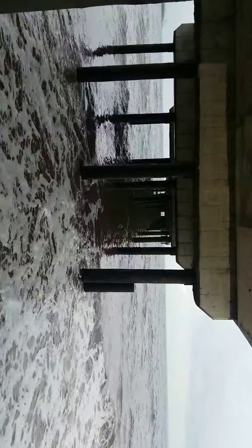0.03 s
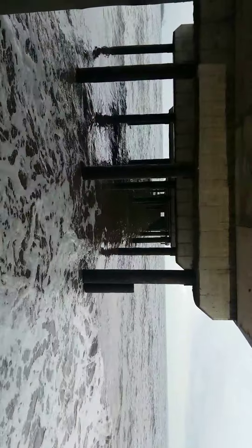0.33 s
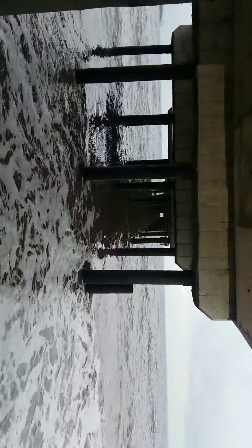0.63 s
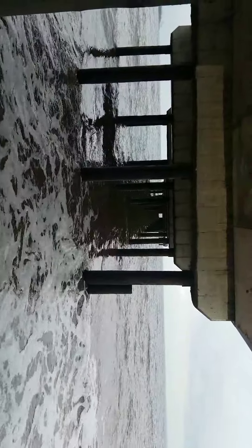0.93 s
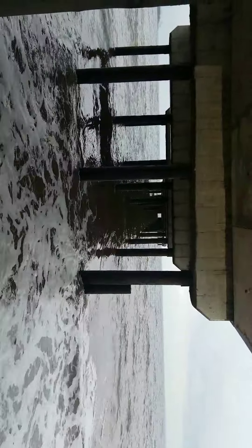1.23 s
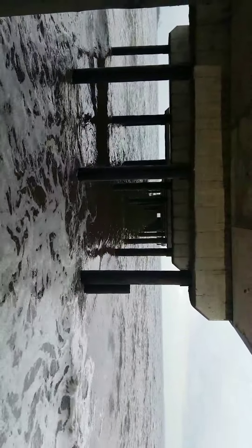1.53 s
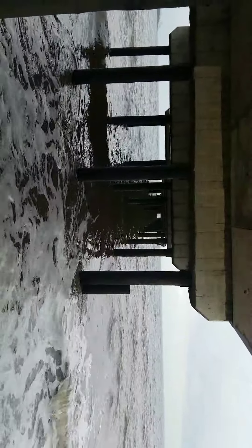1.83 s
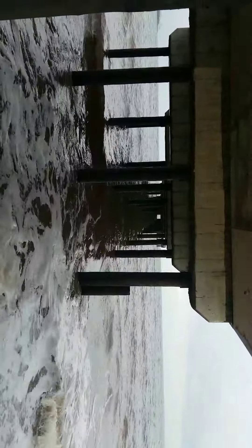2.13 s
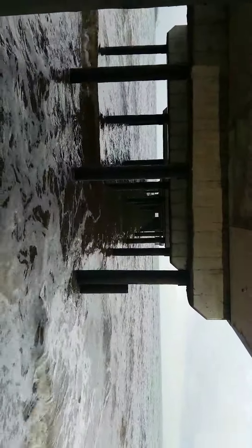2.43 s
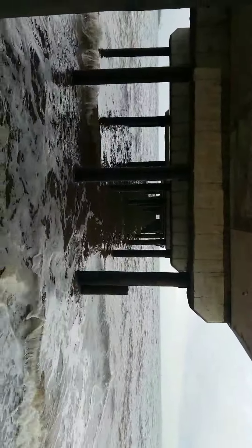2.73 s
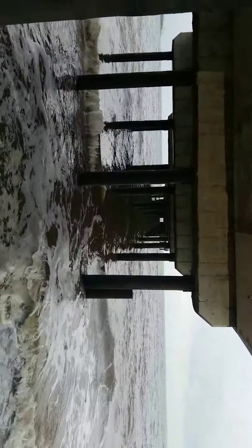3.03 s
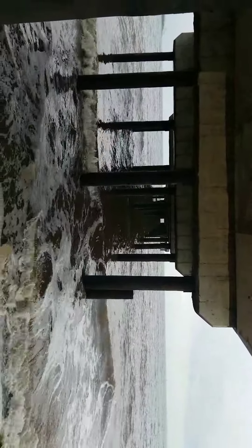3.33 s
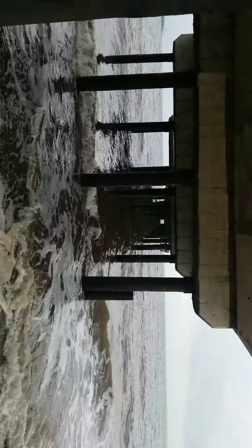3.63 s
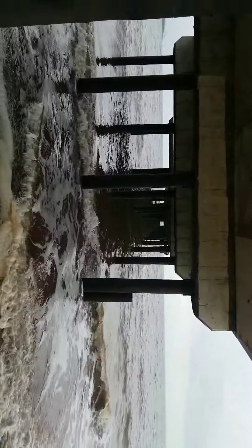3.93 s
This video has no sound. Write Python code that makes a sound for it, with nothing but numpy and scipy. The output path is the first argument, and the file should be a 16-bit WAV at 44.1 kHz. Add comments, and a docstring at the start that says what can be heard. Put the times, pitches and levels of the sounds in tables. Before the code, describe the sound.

Surf fizzes around pier pillars and swells into a roaring, churning breaker.

```python
"""Sea waves heard from under a concrete pier, on two microphones a hand's length apart.
Foam fizzes as the last wave drains round the pillars, with small slaps, gulps and a light breeze.
From about 1 s a larger wave rolls in with a growing roar. It plunges just before 3 s, the air caught
under it gives a hollow boom, and it runs on as churning white water."""
import sys
import numpy as np
from scipy import signal
from scipy.fft import rfft, irfft
from scipy.io import wavfile
from scipy.ndimage import uniform_filter1d

SR = 44100
rng = np.random.default_rng(int(sys.argv[2]) if len(sys.argv) > 2 else 0)


def materialize(psi):
    """Save the field psi as 16-bit PCM at rate SR to the path in sys.argv[1].

    A 1-D psi becomes a single channel; in a 2-D psi each row is a channel.
    """
    bounded = np.clip(np.atleast_2d(psi).T, -1, 1)
    quanta = np.round(bounded * 32767).astype(np.int16)
    wavfile.write(sys.argv[1], SR, quanta)


N = 176400


def amp(db):
    """Decibels to gain."""
    return 10 ** (np.asarray(db) / 20)


def unit(x):
    """Scale to rms 1."""
    return x / np.sqrt(np.mean(x ** 2) + 1e-20)


def db_at(colour, hz):
    """Interpolate a spectrum on a log-frequency axis."""
    points_hz, db = np.transpose(colour)
    return np.interp(np.log(hz + 1), np.log(points_hz + 1), db)


def envelope(points):
    """Gain per sample from a level curve."""
    return amp(np.interp(np.arange(N) / SR, *np.transpose(points)))


def add(mix, start_s, sound):
    """Mix a sound in at start_s."""
    part = mix[round(start_s * SR):][:len(sound)]
    part += sound[:len(part)]


def water(colour, arrivals, patchy_db, flicker_db, frame=1024):
    """Bubbles too dense to separate: patchy noise reaching both microphones from several sides."""
    hop, hz = frame // 4, np.fft.rfftfreq(frame, 1 / SR)
    shape = (N // hop + 5, len(hz))
    left, separate = (rng.standard_normal(shape) + 1j * rng.standard_normal(shape) for _ in range(2))
    patches = uniform_filter1d(rng.standard_normal(shape), size=8, axis=0)
    patches = unit(uniform_filter1d(patches, size=16, axis=1))
    flicker = unit(uniform_filter1d(rng.standard_normal(shape[0]), size=7))[:, None]
    # A spread of delays makes the two sides less alike in the treble.
    rad_per_ms = 2 * np.pi * hz / 1000
    coherence = sum(weight * np.exp(-rad_per_ms * (1j * lead_ms + spread_ms * np.tanh(hz / 1500)))
                    for lead_ms, spread_ms, weight in arrivals)
    coherence /= sum(weight for _, _, weight in arrivals)
    right = coherence * left + np.sqrt(np.maximum(1 - abs(coherence) ** 2, 0)) * separate
    gain = amp(db_at(colour, hz) + patchy_db * patches + flicker_db * flicker)
    spectra = gain * np.array([left, right])
    _, sound = signal.istft(spectra.swapaxes(1, 2), nperseg=frame, noverlap=frame - hop)
    return unit(sound[:, :N])


def bubble_rings(per_s, low_hz, high_hz, decay_cycles, glide, spread_db, pitches=30):
    """Single bubbles: short rising rings of many sizes, each pitch from its own side."""
    out = np.zeros((2, N))
    for hz in np.geomspace(low_hz, high_hz, pitches):
        age = np.arange(0, 5 * decay_cycles / hz, 1 / SR) * hz / decay_cycles
        ring = np.exp(-age) * np.sin(2 * np.pi * decay_cycles * age * (1 + glide * age))
        sizes = amp(spread_db * np.minimum(rng.exponential(1, N), 4.5))
        onsets = rng.random(N) < per_s / pitches / SR
        train = signal.oaconvolve(sizes * onsets, ring)[:N]
        leftward = rng.uniform(-1, 1)
        out += [train * amp(leftward), np.roll(train, round(leftward * 22)) * amp(-3 * leftward)]
    return unit(out)


# Wind spectrum. Each row: frequency in Hz, relative density in dB.
BREEZE_SPECTRUM = [(10, -9), (30, 2), (60, 0), (120, -12), (300, -21), (1000, -48)]
def breeze(level_db=-50.5):
    """Light air rumbles at each microphone separately."""
    gain = amp(db_at(BREEZE_SPECTRUM, np.fft.rfftfreq(N, 1 / SR)))
    return amp(level_db) * unit(irfft(rfft(rng.standard_normal((2, N))) * gain, N))


# Backwash spectrum. Each row: frequency in Hz, relative density in dB.
WASH_SPECTRUM = [(20, -25.5), (45, -4.5), (110, 0), (180, -1), (230, 1), (290, -1.5), (380, -1.5),
                 (550, -9), (800, -12), (1500, -18), (3000, -19.5), (8000, -24), (16000, -47)]
# Its directions. Each row: lead at the left microphone in ms, spread in ms, weight.
WASH_ARRIVALS = [(0.51, .07, 0.54), (-0.38, 0.13, 0.12), (.25, .3, 0.43)]
def backwash(level_db=-35):
    """The spent wave drains steadily round the pillars."""
    return amp(level_db) * water(WASH_SPECTRUM, WASH_ARRIVALS, patchy_db=1.34, flicker_db=0.23, frame=2048)


# Foam envelope. Each row: time in seconds, level in dB.
FOAM_LEVEL = [(0, -40), (.7, -39.5), (.95, -39), (1.2, -40), (1.6, -38.5), (2.0, -37), (2.4, -36.5),
              (2.55, -38), (2.95, -32.5), (3.15, -31), (3.4, -34.5), (3.9, -36)]
# Its spectrum. Each row: frequency in Hz, relative density in dB.
FOAM_SPECTRUM = [(300, -20), (1200, -4), (2200, -.5), (4000, 0.5), (5200, 0.5), (6500, -.3), (9000, -2.7),
                 (10500, 0.9), (12200, 1), (13600, 0.5), (14800, -2)]
# Its directions. Each row: left lead in ms, spread in ms, weight.
FOAM_ARRIVALS = [(.48, .08, 0.37), (-0.49, .1, 0.67)]
def foam():
    """Tiny bursting bubbles hiss on the surface."""
    return envelope(FOAM_LEVEL) * water(FOAM_SPECTRUM, FOAM_ARRIVALS, patchy_db=1.3, flicker_db=0.54)


# Small splashes. Each row: start in seconds, band centre in Hz, level in dB.
PILLAR_SLAPS = [(.575, 2150, -45), (1.15, 750, -39), (1.329, 2400, -42), (2.39, 1050, -31.5),
                (3.683, 1960, -39)]
def slaps(rise_s=0.0054, decay_s=0.094, width_octaves=0.42):
    """Water slaps the pillars in short bursts of band noise."""
    out, t = np.zeros((2, N)), np.arange(SR // 2) / SR
    hz = np.fft.rfftfreq(len(t), 1 / SR)
    burst = np.minimum(t / rise_s, 1) * np.exp(-t / decay_s)
    for start_s, centre_hz, db in PILLAR_SLAPS:
        band = np.exp(-0.5 * (np.log2((hz + 1) / centre_hz) / width_octaves) ** 2)
        for channel in out:
            splash = unit(irfft(rfft(rng.standard_normal(len(t))) * band, len(t)))
            add(channel, start_s, amp(db) * burst * splash)
    return out


# Trapped air. Each row: start in seconds, pitch in Hz, level in dB, ring time in seconds.
AIR_POCKETS = [(1.0, 108.5, -34, .05), (1.19, 276, -31, .03), (2.231, 186, -28.5, 0.059),
               (2.469, 163, -31.5, 0.028), (2.82, 40.3, -29, .06), (2.92, 135, -21.5, 0.044),
               (3.4, 288, -26, 0.04)]
def gulps(glide=0.029):
    """Large air pockets ring briefly, rising a little in pitch."""
    out, t = np.zeros(N), np.arange(SR // 2) / SR
    for start_s, hz, db, ring_s in AIR_POCKETS:
        age = t / ring_s
        swell = 2 * age * np.exp(1 - 2 * age)
        tone = np.sin(2 * np.pi * (hz * t * (1 + glide * age) + rng.random()))
        add(out, start_s, amp(db) * swell * tone)
    return out


# Boom spectrum. Each row: frequency in Hz, relative density in dB.
BOOM_SPECTRUM = [(20, -24), (65, -14.5), (95, -18), (114, 4), (148, -6), (180, -19), (222, 0), (258, -2),
                 (310, -8.5), (420, -14), (550, -20), (2000, -58)]
# Its direction. One row: left lead in ms, spread in ms, weight.
BOOM_ARRIVALS = [(.1, 0.074, 1)]
def plunge(start_s=2.81, rise_s=0.079, fall_after_s=0.34, fall_db_per_s=11, level_db=-25):
    """The crest falls and the air caught under it booms."""
    t = np.arange(N) / SR - start_s
    attack = np.clip(t / rise_s, 0, 1)
    gain = amp(level_db - fall_db_per_s * np.maximum(t - fall_after_s, 0))
    return attack * gain * water(BOOM_SPECTRUM, BOOM_ARRIVALS, patchy_db=0.5, flicker_db=1.7, frame=4096)


# Roller and white-water envelopes. Each row: time in seconds, level in dB.
ROLLER_LEVEL = [(0, -63), (.8, -43.5), (1.0, -37), (1.23, -38.5), (1.42, -33), (1.68, -32.5), (1.9, -28.5),
                (2.12, -28), (2.35, -26.5), (2.55, -26.5), (2.8, -26.5), (3.2, -30.5), (3.9, -33)]
SURF_LEVEL = [(0, -83), (1.8, -58), (2.3, -34), (2.55, -31.5), (2.75, -27.5), (3.0, -26), (3.12, -23),
              (3.3, -23), (3.52, -24.5), (3.7, -24.5), (3.9, -26.5)]
# Their spectra. Each row: frequency in Hz, relative density in dB.
ROLLER_SPECTRUM = [(20, -31), (60, -15), (120, -4.5), (200, 3), (270, -4), (350, -2.5), (520, -10),
                   (850, -10), (1300, -16), (3600, -17.5), (6000, -21.5), (9000, -26.5), (16000, -28)]
SURF_SPECTRUM = [(20, -22), (65, -9), (130, -5.5), (180, -5.5), (240, 0), (350, 0.5), (510, -7.5),
                 (800, -5), (1400, -10), (2100, -10.5), (4000, -14), (6500, -19.5), (9000, -23),
                 (16000, -29)]
# Their directions. Each row: left lead in ms, spread in ms, weight.
ROLLER_ARRIVALS = [(0.34, .06, .55), (-0.39, .13, .43), (0.085, .1, 0.1)]
SURF_ARRIVALS = [(0.092, 0.057, 0.37), (0.26, 0.18, .45), (-0.14, 0.15, .17)]
def wave(spray_relative_db=-14.5, bubbles_relative_db=-12.5):
    """The roller roars and its white water churns; spray and bubbles follow their joint strength."""
    roller, surf = envelope(ROLLER_LEVEL), envelope(SURF_LEVEL)
    roar = roller * water(ROLLER_SPECTRUM, ROLLER_ARRIVALS, patchy_db=1.0, flicker_db=0.45)
    churn = surf * water(SURF_SPECTRUM, SURF_ARRIVALS, patchy_db=1.3, flicker_db=0.36)
    spray = amp(spray_relative_db) * bubble_rings(
        per_s=1800, low_hz=1227, high_hz=6940, decay_cycles=1.2, glide=0.02, spread_db=1.5)
    bubbles = amp(bubbles_relative_db) * bubble_rings(
        per_s=260, low_hz=272.4, high_hz=1410, decay_cycles=3.8, glide=0.021, spread_db=2.5)
    return roar + churn + np.hypot(roller, surf) * (spray + bubbles)


def scene():
    """All the water, and a little wind."""
    return backwash() + foam() + wave() + plunge() + gulps() + slaps() + breeze()


# Microphone port responses. Each row: frequency in Hz, gain in dB.
LEFT_RESPONSE = [(450, -0.05), (560, 0.1), (950, 1.05), (1300, 0.8), (2000, 1), (2800, 0), (3800, 1),
                 (4900, -0.7), (5700, 1.3), (7000, 2), (7900, 0.6), (8900, -0.7), (11500, 0), (13000, 1),
                 (15500, -1.5)]
RIGHT_RESPONSE = [(450, -0.5), (560, -1), (950, 0.8), (1300, -1.3), (2000, -0.5), (3300, -.8), (4500, 0.8),
                  (5100, -1.5), (6200, 0), (7300, -3.5), (8600, 0.6), (10500, 1.3), (11100, 1), (12200, 5),
                  (13700, 1), (15500, 2.5)]
def record(dry):
    """Each port colours the treble and sheds deep bass; the sound stops and the band ends steeply."""
    low_cut_hz, high_cut_hz, stop_s = 42, 15560, 3.92
    hz = np.fft.rfftfreq(N, 1 / SR)
    low_cut = hz ** 2 / np.hypot(hz ** 2, low_cut_hz ** 2)
    ports = amp([db_at(LEFT_RESPONSE, hz), db_at(RIGHT_RESPONSE, hz)])
    coloured = irfft(rfft(dry) * low_cut * ports, N)
    fade = np.exp(-np.maximum(np.arange(N) / SR - stop_s, 0) / 0.003)
    high_cut = signal.firwin(511, high_cut_hz, window=("kaiser", 9), fs=SR)
    return signal.oaconvolve(coloured * fade, high_cut[None], "same")


dry = scene()
out = record(dry)
materialize(out)
```